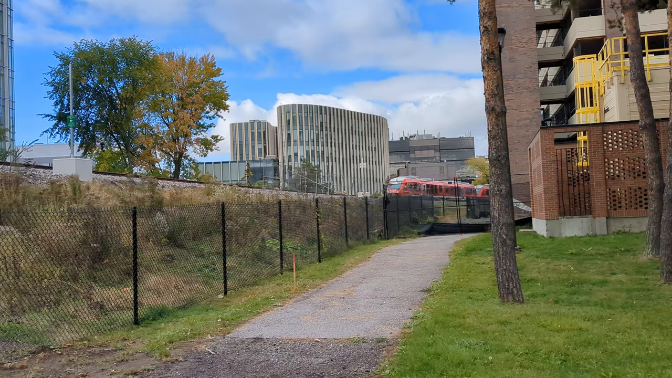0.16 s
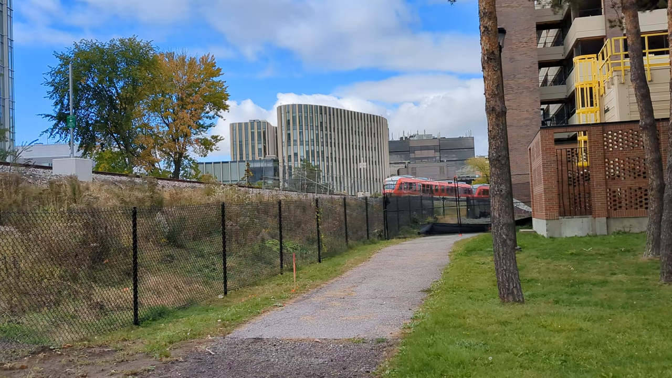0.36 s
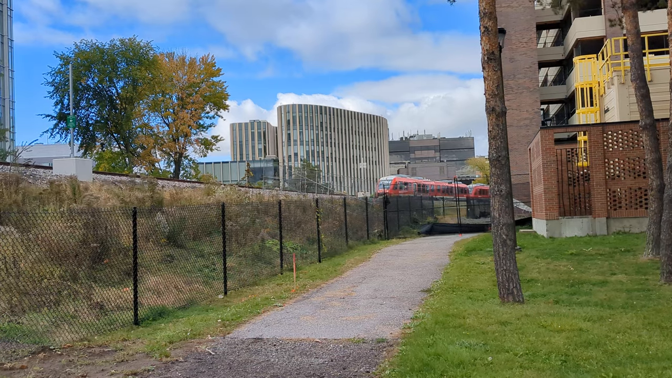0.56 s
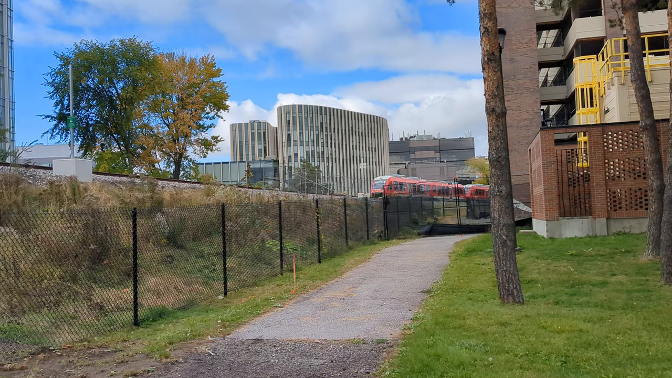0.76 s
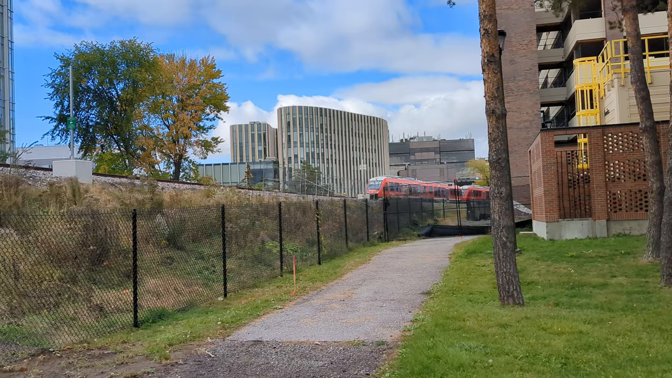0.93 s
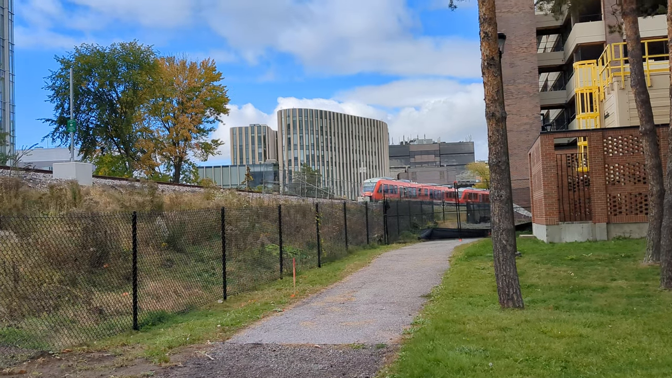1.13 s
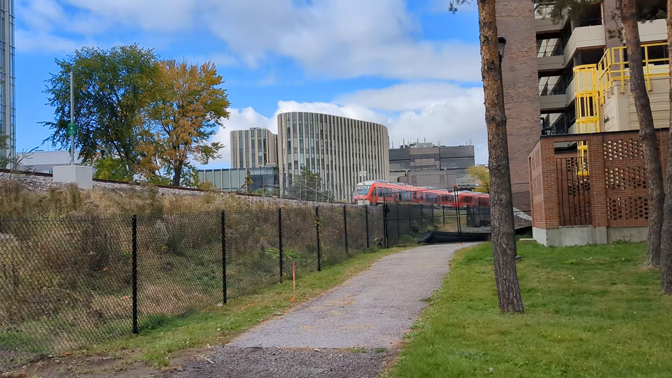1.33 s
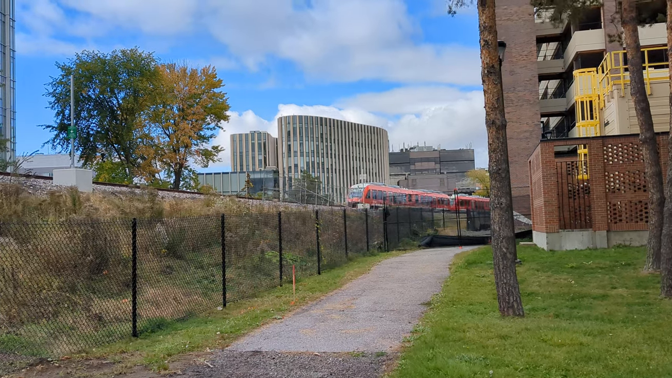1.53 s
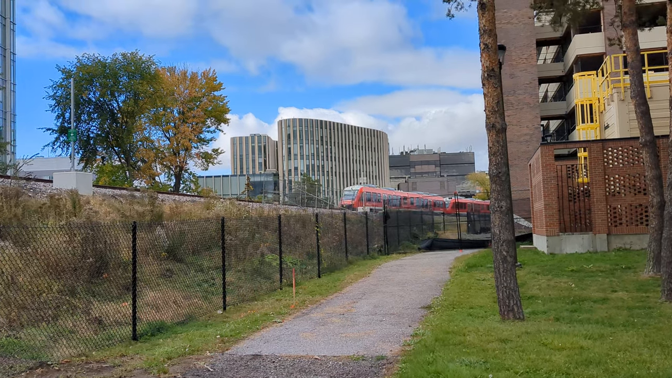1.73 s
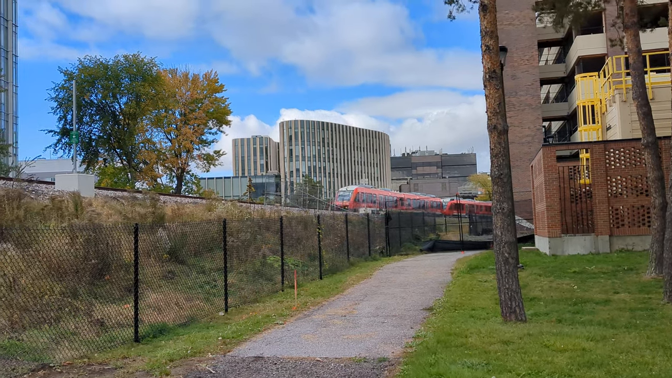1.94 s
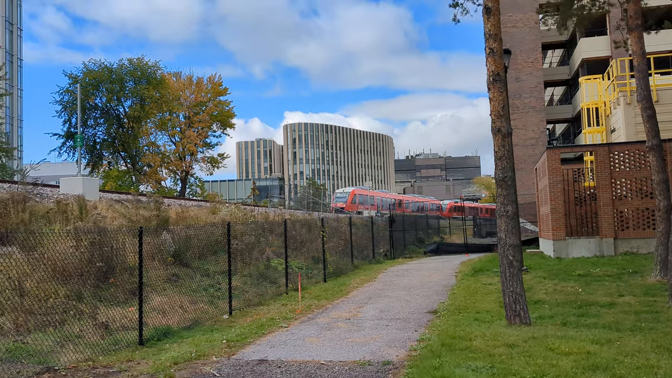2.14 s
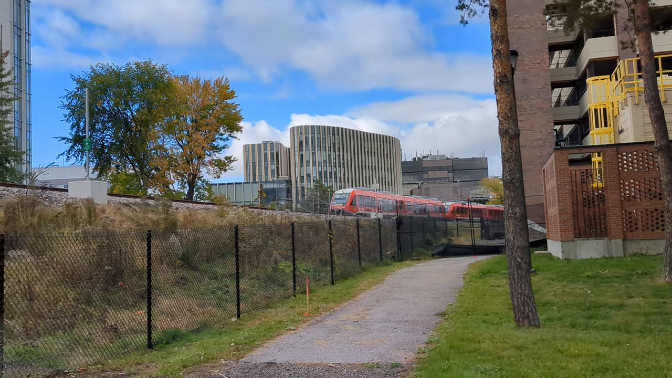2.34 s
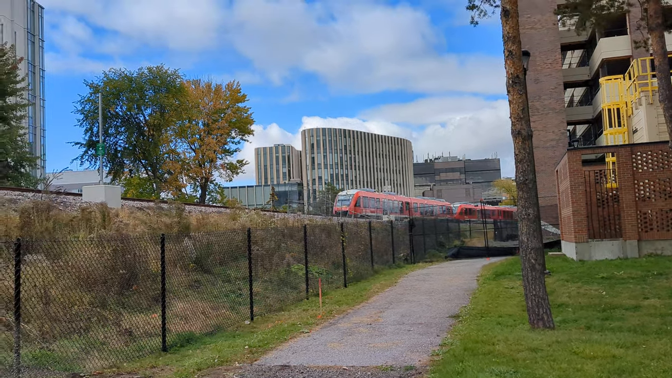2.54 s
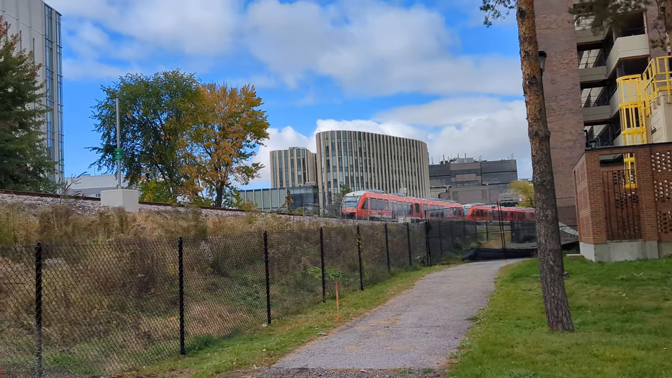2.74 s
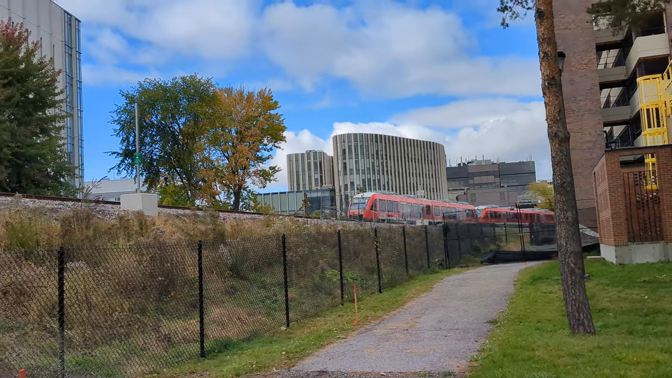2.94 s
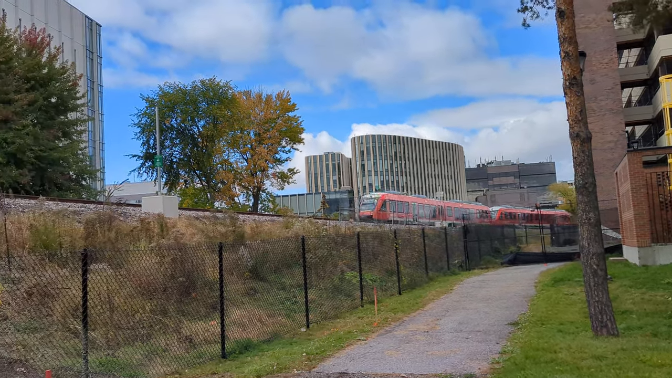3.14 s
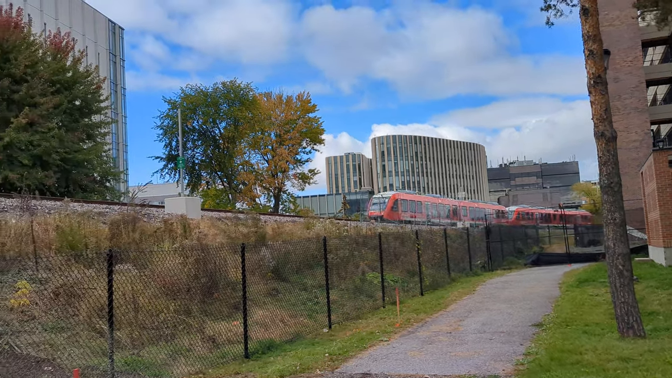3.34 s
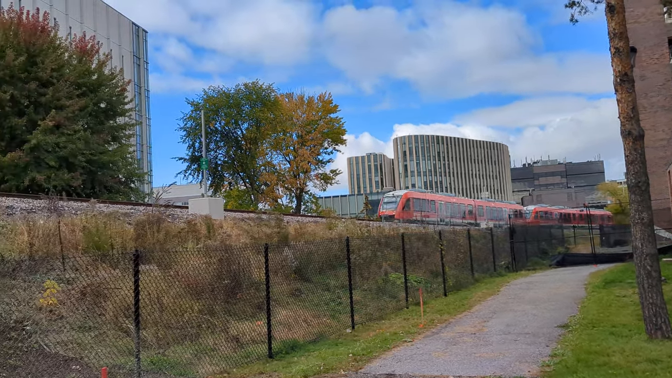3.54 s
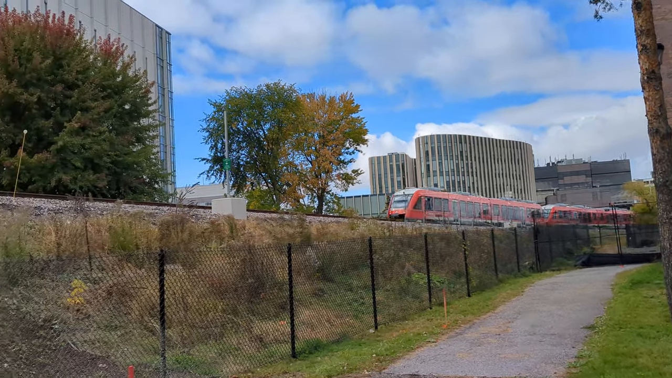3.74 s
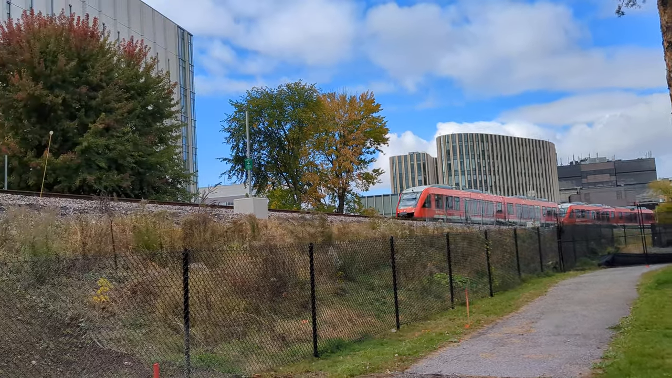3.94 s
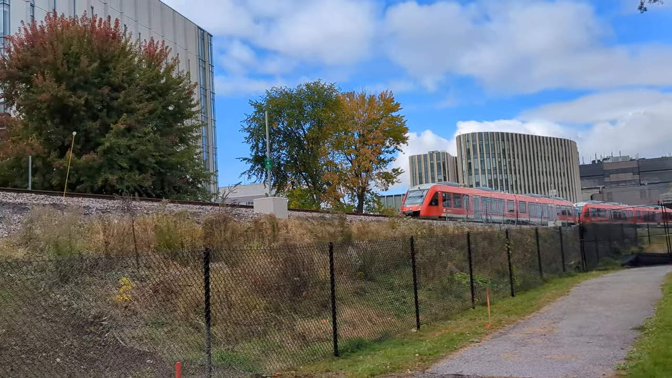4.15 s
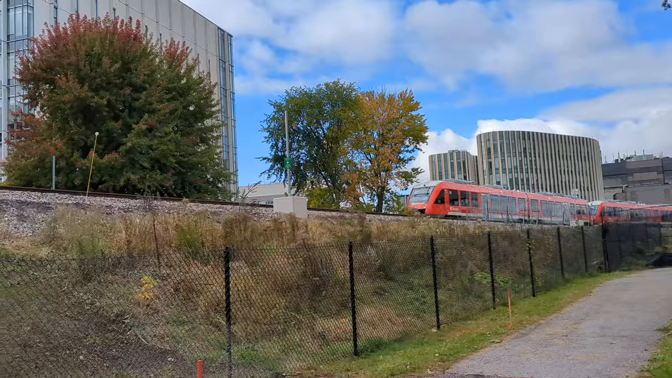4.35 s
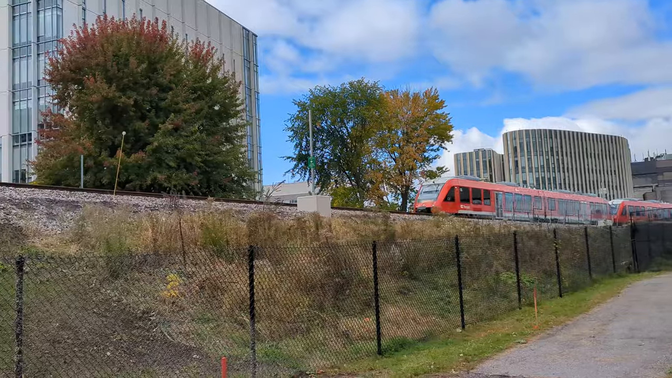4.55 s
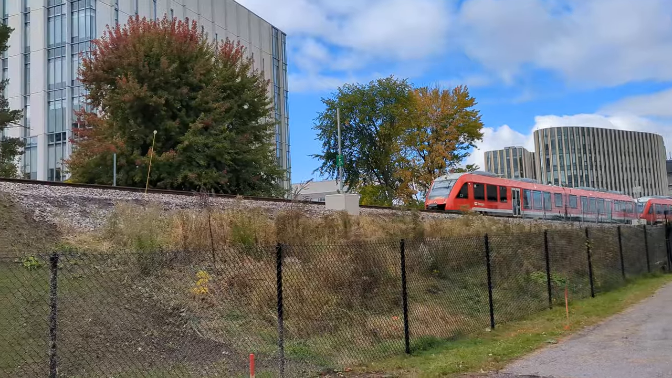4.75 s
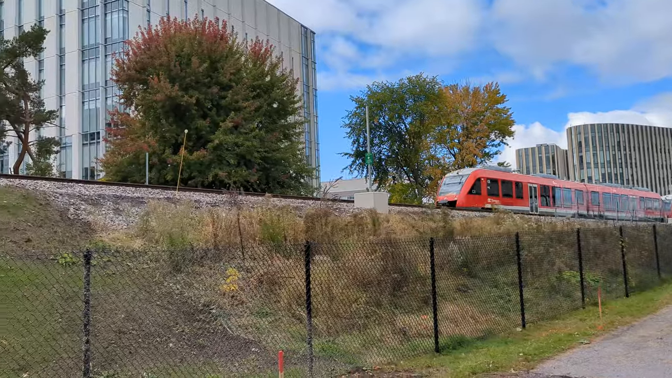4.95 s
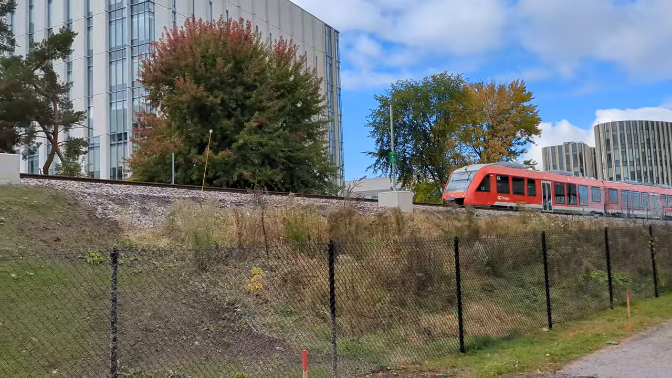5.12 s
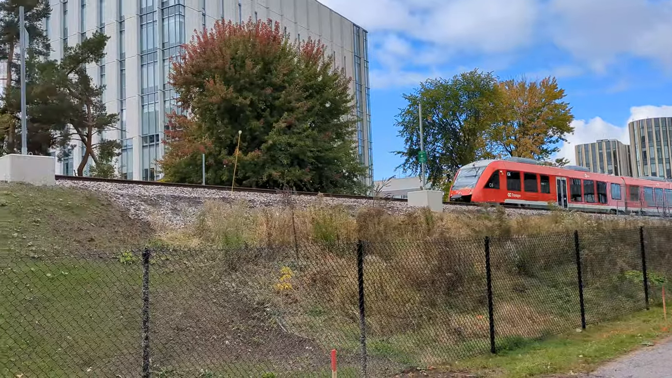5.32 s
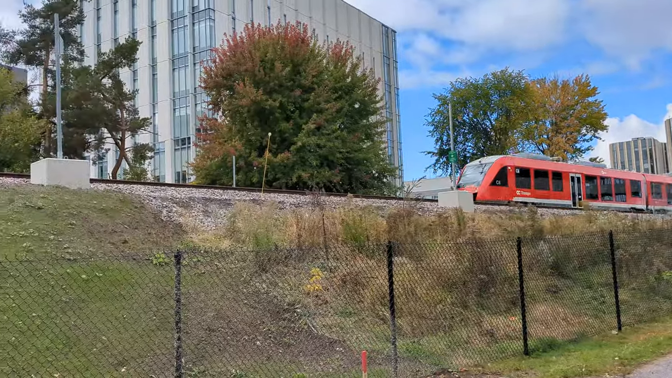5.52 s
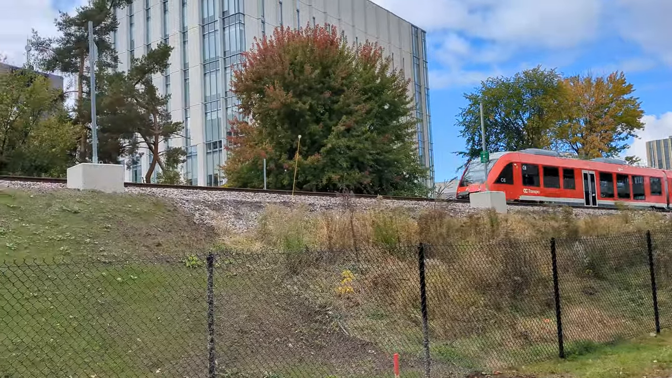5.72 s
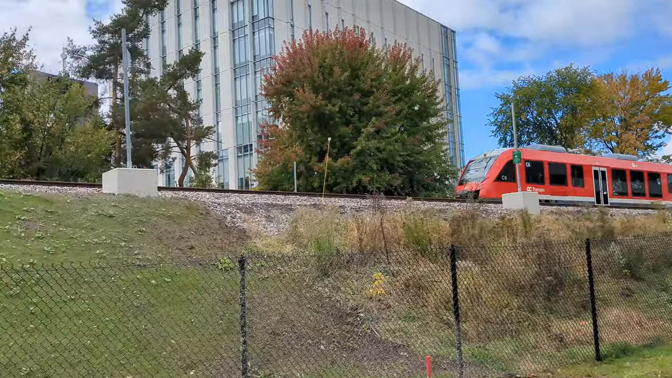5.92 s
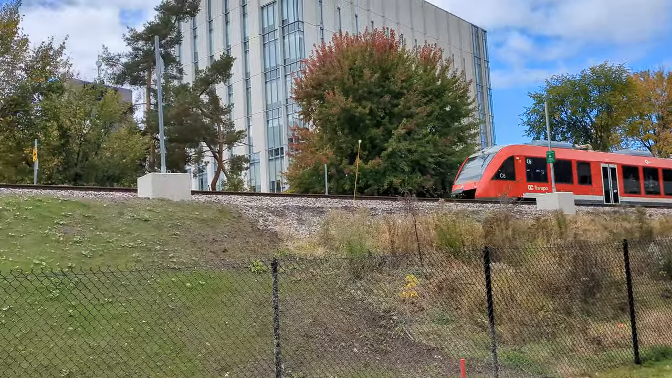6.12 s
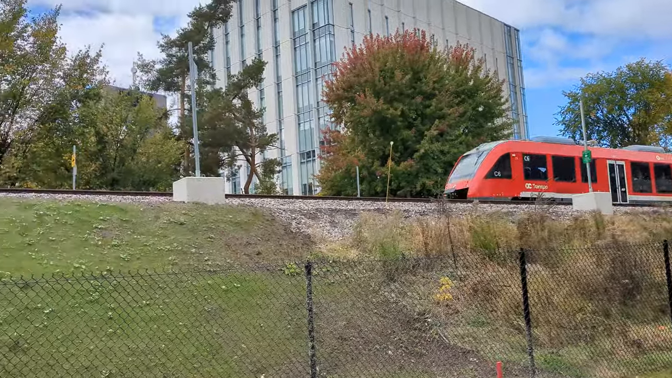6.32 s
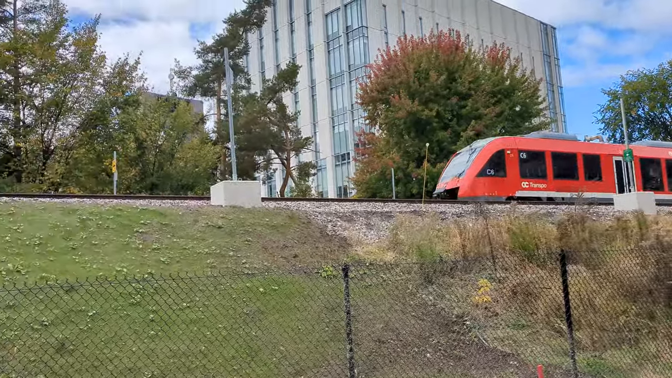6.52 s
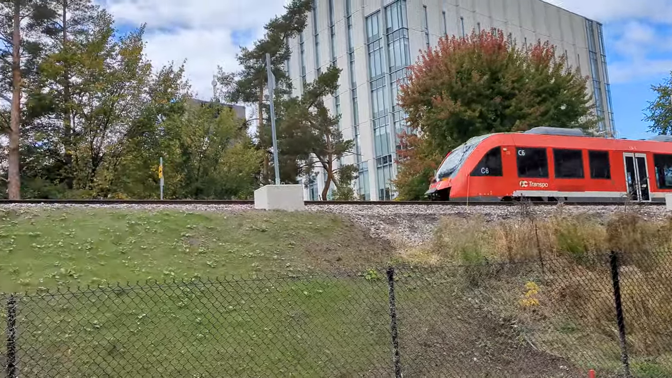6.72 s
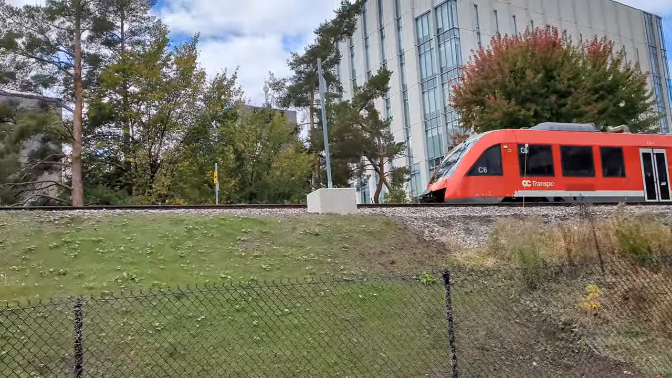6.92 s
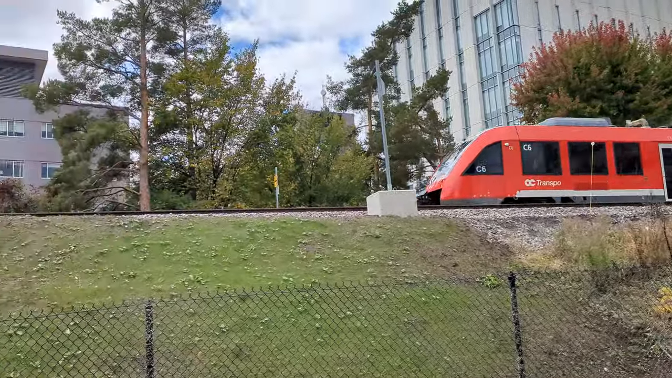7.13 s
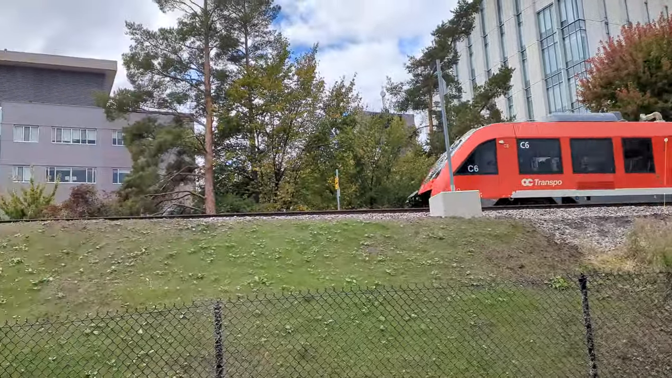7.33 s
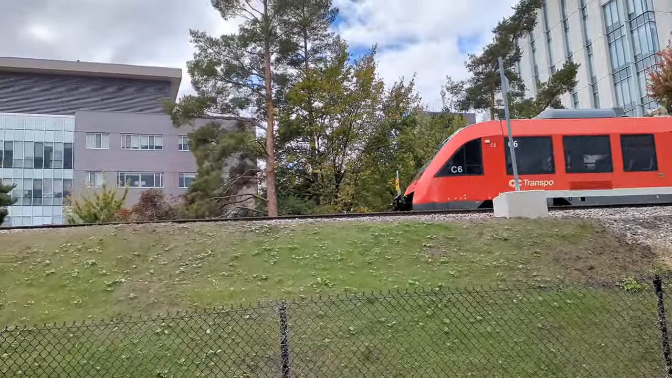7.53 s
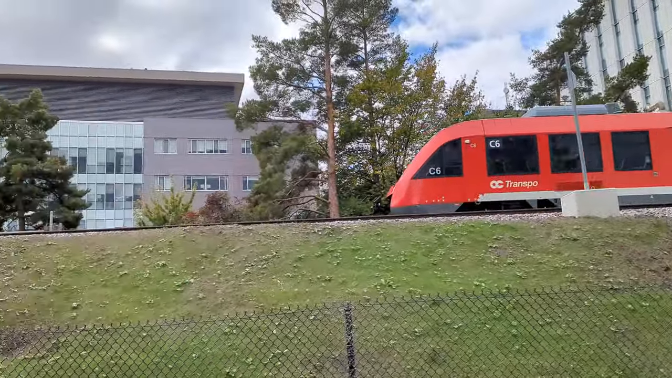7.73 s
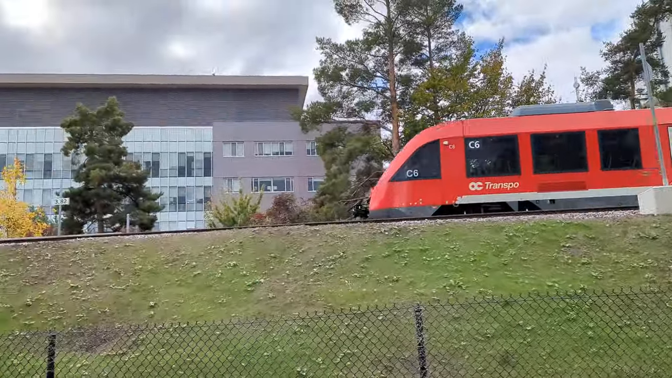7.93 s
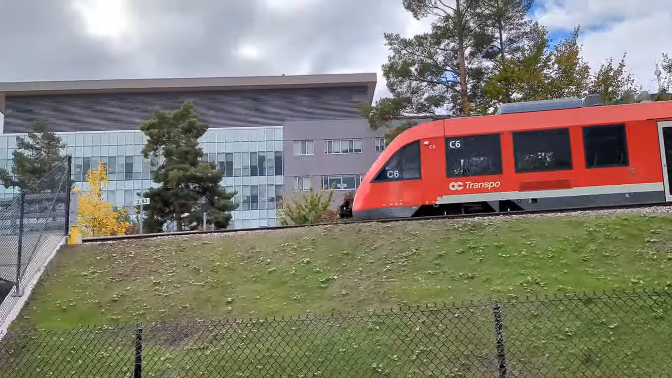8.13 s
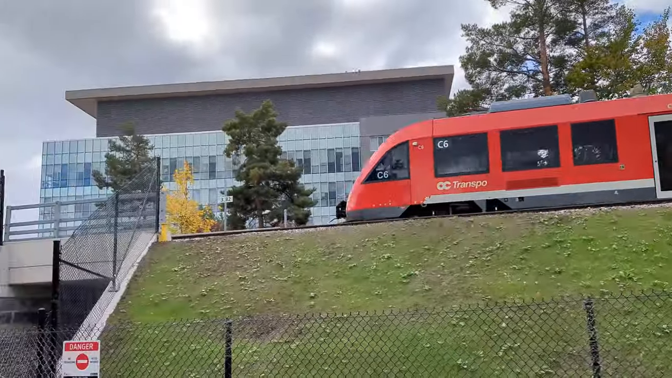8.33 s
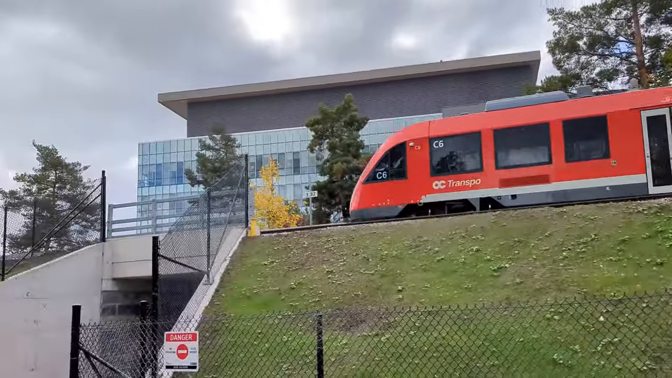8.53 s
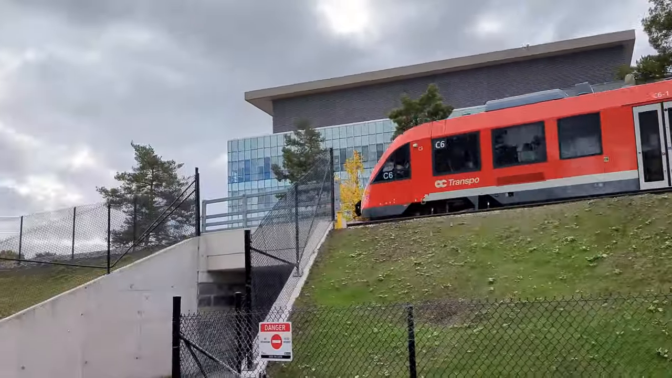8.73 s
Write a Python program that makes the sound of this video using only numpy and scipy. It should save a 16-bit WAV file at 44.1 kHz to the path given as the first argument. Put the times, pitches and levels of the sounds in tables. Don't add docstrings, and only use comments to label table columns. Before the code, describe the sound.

Intermittent steel wheel squeal and grinding from an approaching diesel train grows louder and shriller, with engine hum, wheel roar and low wind gusts.

```python
import sys
import numpy as np
from scipy import signal
from scipy.fft import rfft, irfft, next_fast_len
from scipy.io import wavfile
from scipy.ndimage import uniform_filter1d, map_coordinates

SR = 44100
rng = np.random.default_rng(int(sys.argv[2]) if len(sys.argv) > 2 else 0)


def digitize_waveform(pressure):
    field = np.atleast_2d(pressure).T
    bounded = np.clip(field, -1, 1)
    quanta = np.round(bounded * 32767).astype(np.int16)
    wavfile.write(sys.argv[1], SR, quanta)


def how_loud(loudness_db):
    steps = np.asarray(loudness_db, float) / 20
    return 10 ** steps


N = 386757

# (frequency [Hz], level [dB])
EDDY_FLUTTER = [(100, -4), (200, 2), (300, -1), (450, -9.5), (620, -16), (900, -34)]


def unit(x):
    return x / np.sqrt(np.mean(x ** 2) + 1e-20)


def curves(rows):
    s, *cols = np.transpose(rows)
    return [np.interp(np.arange(N) / SR, s, c) for c in cols]


def window(rows, fade):
    t = np.arange(N) / SR
    inside = np.minimum(t - rows[0][0], rows[-1][0] - t)
    return np.clip(inside / fade + 1, 0, 1)


def wobble(rate):
    knots = int(N * rate / SR) + 2
    return np.interp(np.arange(N) * rate / SR, np.arange(knots), rng.standard_normal(knots))


def swell(peak, rise, fall):
    t = np.arange(N, dtype=np.float32) / SR - peak
    return np.maximum(-t / max(rise, .01), t / max(fall, .01))


def shape(points):
    f, db = np.transpose(points)
    return lambda hz: how_loud(np.interp(np.log(hz + 1), np.log(f + 1), db, left=-120, right=-120))


def mode(hz, centre_hz, width_hz):
    return width_hz / np.hypot(width_hz, 2 * (hz - centre_hz))


def noise(gain, channels=3):
    size = next_fast_len(N)
    hz = np.fft.rfftfreq(size, 1 / SR)
    draw = rng.standard_normal((2, channels, len(hz)), dtype=np.float32)
    spectrum = (draw[0] + 1j * draw[1]) * gain(hz).astype(np.float32)
    return unit(irfft(spectrum, size)[:, :N])


def filtered(x, gain):
    edge = SR // 10
    size = next_fast_len(N + 2 * edge)
    z = rfft(np.pad(x, ((0, 0), (edge, size - N - edge)), "reflect"))
    return irfft(z * gain(np.fft.rfftfreq(size, 1 / SR)), size)[:, edge:edge + N]


def arrive(trio, direct, order=1, lag=1):
    # (time [s], delay of left after right [ms])
    ear_delay = [
        (0, 0.049),
        (2.5, 0.02),
        (3.5, 0.081),
        (4.5, .17),
        (6, .26),
        (6.8, 0.12),
        (7.5, .36),
        (8.77, .36),
    ]
    half = lag * curves(ear_delay)[0] * SR / 2000
    both = [map_coordinates(trio[0], [np.arange(N) - side * half], order=order, mode="nearest")
            for side in (1, -1)]
    return np.sqrt(direct) * np.array(both) + np.sqrt(1 - direct) * trio[1:]


def gaps(hz):
    # (frequency [Hz], width [Hz], share lost [0 to 1])
    valleys = [(3213, 166, .6), (4050, 165, .4), (5160, 166, .45)]
    return np.prod([1 - lost * mode(hz, c, w) ** 2 for c, w, lost in valleys], axis=0)


def steel():
    # (frequency [Hz], difference [dB])
    lean = [(1000, -29), (1800, -5.5), (3000, 7), (5000, 0), (10000, 0.5), (15000, 1.5)]
    sides = np.array([[.5], [-.5]])
    both = arrive(flanges() + squeals(), direct=.58, order=3)
    return filtered(both, lambda hz: gaps(hz) * shape(lean)(np.clip(hz, 1000, 15000)) ** sides)


def contact():
    # (start [s], length [s], grind [dB], growl over it [dB], sizzle over it [dB])
    rubs = [(0, .33, -54, 3, -16), (0.704, 0.58, -54, -1.5, -16), (1.402, 0.08, -51, -2, -23),
            (1.623, 0.076, -51.5, -6, -16), (2.007, .36, -46, -2.5, -14), (2.52, 0.088, -46.5, 0.5, -15),
            (2.64, .7, -43.5, -9, -14), (3.401, 0.27, -43, 1.5, -17), (3.787, 0.44, -47, -1, -12.5),
            (4.22, 0.24, -45, -1.5, -17), (4.511, 0.29, -38, -1, -13.5), (4.851, 0.63, -41.5, -4, -4),
            (5.41, 0.15, -38.5, -2.5, -14), (5.64, 0.56, -40.5, -5.5, -14), (6.265, 0.21, -43, -3, -5),
            (6.513, 0.16, -37.5, -11.5, -9), (6.736, 0.11, -42.5, -4, -6), (6.895, 0.33, -37, -4, -3),
            (7.31, .12, -45, -2, -13), (7.465, 0.31, -34, -7.5, -5.5), (7.868, 0.11, -36, -3.5, -6.5),
            (8.02, 0.21, -32, -4.5, -3), (8.296, 0.31, -34.5, -7.5, -14), (8.66, .15, -42, -4, -3)]
    bite_s, let_go_db_per_s = 0.022, 96
    step = SR // 200
    t = np.arange(0, N + step, step) / SR
    power = 1e-10
    for s, length, db, growl_db, sizzle_db in rubs:
        fading = how_loud(db - let_go_db_per_s * np.maximum(t - s - length, 0))
        held = np.clip((t - s) / bite_s + 1, 0, 1) * fading
        power = power + (held * how_loud([[0], [growl_db], [sizzle_db]])) ** 2
    return [np.interp(np.arange(N) / SR, t, np.sqrt(p)) for p in power]


def flanges():
    # (frequency [Hz], level [dB])
    grind_tone = [(1760, -27), (3000, -13.5), (3190, -19), (3530, -10), (3920, -7.5), (4520, -4),
                  (5070, -10.5), (7090, -6.5), (7910, -9.5), (10500, -13), (13600, -66), (22000, -120)]
    growl_tone = [(1300, -19.5), (1700, -9), (2000, -5.5), (2400, -2.5), (2800, -8), (3050, -9.5),
                  (3250, -14)]
    sizzle_tone = [(8000, -9.5), (10500, -7.5), (12200, -4), (12700, -14), (13600, -19), (13900, -36),
                   (15000, -36), (15700, -36)]
    # (frequency [Hz], width [Hz], level over the grind [dB])
    wheel_modes = [(2350, 250, -0.5), (2980, 50, 9), (3470, 200, 10), (4670, 100, 3.5), (5370, 140, 4.5),
                   (5940, 27, 6), (6680, 140, 2.5), (6970, 120, 0.5), (8750, 70, 3), (9330, 100, 6.5),
                   (9960, 85, 5.5), (13000, 28.7, 7), (13430, 25, 7), (14270, 40, 7)]
    grind, growl, sizzle = contact()
    pitches, levels = rng.uniform(2000, 15000, size=70), rng.normal(5, 2, size=70)
    minor = [(c, 22, db) for c, db in zip(pitches, levels)]
    hz = np.fft.rfftfreq(next_fast_len(N), 1 / SR).astype(np.float32)
    modes = wheel_modes + minor
    ring = np.sqrt(1 + sum((float(how_loud(db)) * mode(hz, float(c), w)) ** 2 for c, w, db in modes))
    layers = how_loud(2.0) * grind * noise(lambda f: ring * shape(grind_tone)(f))
    layers = layers + how_loud(-1.5) * growl * noise(lambda f: ring * shape(growl_tone)(f))
    layers = layers + how_loud(5.5) * sizzle * noise(lambda f: ring * shape(sizzle_tone)(f))
    chatter = how_loud(0.78 * wobble(14) + 0.39 * wobble(90))
    return chatter * patches(layers, depth_db=2.0)


def patches(x, depth_db):
    z = signal.stft(x.astype(np.float32), nperseg=512)[2]
    field = uniform_filter1d(rng.standard_normal(z.shape[1:]), size=5, axis=0)
    field = uniform_filter1d(field, size=14, axis=1)
    return signal.istft(z * how_loud(depth_db * unit(field)).astype(np.float32), nperseg=512)[1][:, :N]


def songs():
    # (peak [s], rise [s], fall [s], level [dB])
    low_song = [(.05, 0.034, 0.096, -45), (.24, 0.11, 0.66, -49), (.74, .05, 0.4, -45),
                (1.2, 0.44, 0.16, -45.5), (1.66, 0.056, 0.1, -41), (2.04, 0.042, 0.33, -41.5),
                (2.3, 0.3, 0.1, -35.5), (2.75, 0.3, 1, -42.5), (4.25, 0.13, 0.17, -39.5),
                (4.62, 0.15, 0.2, -34.5), (5.01, 0.096, 0.042, -41), (5.46, .07, 0.18, -38.5),
                (6.98, 0.1, 0.51, -35), (7.6, 0.29, 0.42, -45), (8.06, 0.21, 0.05, -33),
                (8.5, 0.74, 0.23, -42)]
    # (peak [s], rise [s], fall [s], level [dB], pitch [Hz])
    mid_song = [(4.08, .3, .35, -42.5, 10190), (5.0, 0.37, 0.07, -41, 10170),
                (5.201, .13, 0.53, -38, 10160), (6.0, 0.41, 0.65, -37.5, 10100),
                (6.2, 0.27, 0.27, -43, 9950), (6.45, 0.64, 0.34, -34.5, 10250),
                (6.7, 0.4, 0.067, -31.5, 10190), (6.95, .3, 0.33, -37.5, 10155),
                (7.7, 0.2, .15, -34, 10100), (7.5, .05, .3, -40, 10300), (8.08, 0.074, 0.22, -30, 10000),
                (8.5, .09, .1, -37, 10300)]
    high_song = [
        (7.1, .25, .25, -50, 11600),
        (7.58, 0.18, 0.2, -30.5, 11644),
        (8.08, .07, .1, -33, 11580),
        (8.21, 0.11, 0.18, -24, 11540),
        (8.57, 0.35, 0.08, -26, 11510),
        (8.77, .15, 0.11, -38, 11640),
    ]
    # (peak [s], rise [s], fall [s], level [dB], pitch [Hz])
    pure_cries = [(3.406, 0.025, 0.16, -52.5, 1377), (2.08, 0.14, 0.45, -48, 3030),
                  (2.6, .08, 1, -56, 2977), (5.23, 0.42, .25, -39, 8885), (6.92, 0.064, 0.2, -38, 5884),
                  (7.1, .1, .25, -43, 5800), (0.98, .3, .5, -59, 2972), (0.96, .08, .1, -56, 4480),
                  (1.63, .2, .3, -56, 3300), (3.04, .15, 0.23, -48, 4660), (3.15, .4, .4, -52, 2972),
                  (7.1, 0.14, 0.25, -35.5, 6990), (7.8, .25, .12, -51, 12600), (8.4, .03, 0.48, -51, 13435),
                  (7.694, 0.26, 0.11, -36.5, 5854), (7.55, .08, 0.64, -41.5, 8620),
                  (8.51, .08, .12, -34.5, 5870)]
    hazy_cries = [(2.245, 0.17, 0.22, -45.5, 7140), (2.05, .05, 0.89, -51.5, 8900),
                  (2.89, 0.3, 0.23, -41, 8900), (2.73, .15, .6, -49, 4550), (3.1, .35, 0.34, -46.5, 4700),
                  (3.55, 0.2, 0.27, -48.5, 11400), (3.46, .2, .5, -46, 5800), (3.75, 0.39, 0.47, -46, 5400),
                  (4.4, .06, 0.063, -43.5, 4760), (5.32, 0.68, 0.21, -39, 7150),
                  (7.46, 0.11, 0.77, -37, 9400), (8.06, .3, 0.98, -34.5, 9350),
                  (8.04, 0.042, 0.3, -33.5, 6960), (8.42, .1, .3, -40, 7100), (3.2, .05, 0.054, -48, 7100),
                  (8.64, .12, .05, -38, 4600), (.7, .015, .06, -55, 4200), (2.8, .2, .3, -52, 5400),
                  (7, .15, .35, -48, 4613), (7.92, .03, .05, -40, 8800), (.32, .04, .03, -45, 3545),
                  (2.74, .15, 0.24, -53, 4440), (7, .05, .04, -45, 3500), (5.5, .1, .06, -45, 3650)]
    # (pitch [Hz], width [Hz], skirt [dB], bursts as in the lowest song)
    scrapes = [
        (2100, 910, -25, [(2.604, 0.041, 0.097, -41.5)]),
        (5270, 2100, -31, [(5.46, .07, 0.16, -40)]),
    ]
    sung = [(3550, 13, -5, low_song), *scrapes]
    kinds = [(15, 3.5, mid_song), (18, -3, high_song), (16, -12.5, pure_cries), (24, -4, hazy_cries)]
    for width_hz, skirt_db, cries in kinds:
        sung += [(hz, width_hz, skirt_db, [burst]) for *burst, hz in cries]
    return sung


def squeals():
    wider, lower = 7.4, 2.9
    drop_db = 13
    steady, wander = .7, .35
    out = np.zeros((3, N))
    press = contact()[0] ** 0.36
    rub, shake = noise(np.ones_like).astype(np.float32), wobble(25)
    drift = np.array([wobble(3), wobble(3), wobble(3)])
    load = 1 + .0006 * wobble(7)
    for hz, width_hz, skirt_db, bursts in songs():
        level = np.zeros(N)
        for peak, rise, fall, db in bursts:
            gone = swell(peak, rise, fall)
            on = gone < 1.3
            burst = how_loud(db - drop_db * gone[on]) * np.clip(3.7 * (1.3 - gone[on]), 0, 1)
            burst = burst / press[min(int(abs(peak) * SR), N - 1)]
            level[on] = np.hypot(level[on], burst)
        first, last = np.flatnonzero(level)[[0, -1]]
        size = next_fast_len(max(last - first, SR // 2))
        start = max(min(first, N - size), 0)
        f = np.fft.rfftfreq(size, 1 / SR)
        core = mode(f, hz, width_hz) ** 2.8
        skirt = mode(f, hz - lower * width_hz, wider * width_hz) ** 1.016
        skirt = how_loud(skirt_db) / np.sqrt(wider) * skirt
        lock = steady * (width_hz < 100)
        total = np.sqrt(np.mean(core ** 2 + skirt ** 2))
        gain = np.hypot(np.sqrt(1 - lock) * core, skirt) / total
        cry = irfft(rfft(rub[:, start:start + size], size) * gain.astype(np.float32), size)
        cry = cry[:, :last - first]
        pitch = hz * load[first:last] + wander * width_hz * np.roll(shake, int(hz) * 17)[first:last]
        turn = 2 * np.pi * np.cumsum(pitch) / SR
        tone = np.sin(turn + 3 * drift[:, first:last])
        cry = cry + np.sqrt(2 * lock * np.mean(core ** 2)) / total * tone
        uneven = how_loud(2.0 + 1.34 * np.roll(shake, int(hz) * 31)[first:last])
        out[:, first:last] += uneven * (press * level)[first:last] * cry
    return out


def engine(rows, orders, shake_db):
    hz, db = curves(rows)
    turn = 2 * np.pi * np.cumsum(hz) / SR
    apart = (.1 + .38 * wobble(4)) * np.array([[1], [-1]])
    hum = sum(how_loud(level + shake_db * wobble(15)) * np.sin(k * turn + 0.39 * wobble(7.6) + apart)
              for k, level in orders)
    return np.sqrt(2) * how_loud(db) * window(rows, fade=0.43) * hum


def near_engine():
    # (time [s], firing rate [Hz], level [dB])
    near_hum = [(5.5, 61.2, -54), (5.87, 61.8, -48.5), (7.0, 64, -37.5), (7.52, 65.2, -34),
                (7.57, 65.4, -25), (7.66, 65.7, -24), (7.7, 65.8, -19), (7.89, 65.84, -16.5),
                (7.97, 66, -24), (8.02, 66.25, -20), (8.12, 66.5, -25), (8.24, 67.1, -30.5),
                (8.3, 66.9, -42), (8.77, 67.4, -40)]
    # (multiple of firing rate [times], level [dB])
    near_overtones = [(.5, -25), (1, 0), (1.5, -26), (2, -20), (3, -28), (5, -28), (6, -24)]
    return engine(near_hum, near_overtones, shake_db=1.8)


def far_engine():
    # (time [s], firing rate [Hz], level [dB])
    far_hum = [
        (0.0, 66.54, -56.5),
        (1.2, 70.2, -56.5),
        (1.6, 70.5, -56),
        (3.25, 75.9, -50.5),
        (3.34, 75.8, -43),
        (3.72, 78.84, -37.5),
        (4.33, 80.45, -43),
        (4.87, 70.9, -54),
        (5.0, 71.5, -64),
    ]
    # (multiple of firing rate [times], level [dB])
    far_overtones = [(.5, -17), (1, 2), (2, -9), (3, -14.5)]
    return engine(far_hum, far_overtones, shake_db=1.5)


def rolling():
    # (time [s], level [dB])
    roar_level = [(0, -51.5), (.64, -58), (.75, -53), (1.98, -55), (3.08, -53), (3.66, -45), (4.35, -51),
                  (5.35, -51.5), (5.49, -45), (6.06, -52), (6.15, -47.5), (6.6, -55), (6.91, -47.5),
                  (7.35, -51), (7.64, -40.5), (8.01, -38), (8.4, -45), (8.77, -47)]
    # (frequency [Hz], level [dB])
    roar_tone = [(110, -20), (180, -5.5), (220, -4), (275, -8.5), (415, -7.5), (540, -6), (674, -1.5),
                 (858, -4.5), (998, -12), (1210, -6.5), (1320, -1.5), (1640, -10), (2000, -7.5),
                 (2600, -20), (4400, -120)]
    # (frequency [Hz], width [Hz], level [dB])
    drone_modes = [(334, 120, -3.5), (393, 167, 3.5)]
    roar_db, = curves(roar_level)
    drone_db = -12.5 + 1.6647 * np.arange(N) / SR
    hollow = noise(lambda f: sum(how_loud(db) * mode(f, c, w) ** 2 for c, w, db in drone_modes))
    drone = arrive(hollow, direct=.9)
    roar = arrive(noise(shape(roar_tone)), direct=0.53, lag=0.64)
    return how_loud(roar_db + 0.46 * wobble(11)) * (how_loud(3.0) * roar + how_loud(drone_db) * drone)


def murmur():
    band = arrive(noise(lambda f: mode(f, 450, 190) ** 2), direct=.8)
    gone = swell(peak=6, rise=1, fall=1.3)
    return how_loud(-53.5 - 8 * gone ** 2 + 2.5 * wobble(12)) * band


def wind():
    # (peak [s], rise [s], fall [s], level [dB], flutter over it [dB])
    blows = [(.2, 0.67, 0.42, -57.5, -9), (1.46, .7, 0.32, -46.5, -9), (2.69, 0.61, 0.26, -51, -6),
             (3.7, 0.49, 0.61, -38, -8.5), (4.33, 0.17, 0.093, -35.5, -3.5), (5.03, 0.22, 0.18, -42, -12),
             (5.13, 0.092, 0.11, -51, -3), (5.8, 1, 0.17, -48.5, -8.5), (6.18, 0.031, .08, -53, 6),
             (6.95, 1, 0.46, -48, -25), (7.69, 0.18, .3, -31.5, -16), (7.89, 0.12, 0.32, -27, -10.5),
             (8.33, 0.12, 0.29, -31.5, -10), (8.6, 0.24, 0.11, -45.5, 3)]
    # (frequency [Hz], level [dB])
    buffet_tone = [(15, -42), (30, -5), (50, -0.5), (100, 0), (160, -6.5), (240, -28.5), (400, -35)]
    calm_db, drop_db = -63.5, 11.5
    power = how_loud([[calm_db], [calm_db - 8]]) ** 2
    for peak, rise, fall, db, flutter_db in blows:
        push = how_loud([[db], [db + flutter_db]]) * how_loud(-drop_db * swell(peak, rise, fall))
        power = power + push ** 2
    gust, flutter = np.sqrt(power)
    lumps = how_loud(3.9 * np.array([wobble(22), wobble(22), wobble(22)]))
    eddies = lumps * (gust * noise(shape(buffet_tone)) + flutter * noise(shape(EDDY_FLUTTER)))
    return how_loud(-3.0) * (1.14 * eddies[0] + 1.42 * eddies[1:])


def puffs():
    # (time [s], peak level [dB], pitch [Hz], left over right [dB])
    slaps = [(1.416, -32, 136, -2), (1.693, -36.5, 75.4, -11), (3.539, -25, 72.4, -6),
             (3.608, -37, 78.1, -1.0), (3.687, -40, 85.4, 1), (3.79, -29, 81.2, 22),
             (3.908, -25.5, 72.4, -11), (4.239, -29, 131.4, 19), (4.312, -25.5, 73.4, 17),
             (4.379, -23, 71.5, 12), (5.133, -29, 72, -16), (6.155, -35, 390, 2), (6.17, -34, 420, 4),
             (6.184, -33, 470, 4), (6.22, -37, 372, 0), (6.25, -37, 380, 0), (4.218, -34, 181, 12),
             (4.263, -32, 298, 19), (4.328, -30.5, 420, 17), (4.338, -30, 330, 15), (4.385, -35, 380, 15),
             (4.41, -30.5, 140, 12), (7.467, -36, 325, 1), (7.627, -29, 330, 2), (7.829, -30, 380, 2.5),
             (7.894, -22.5, 300, -8), (8.03, -27, 250, 5), (8.058, -24, 280, 4.5),
             (8.48, -27.5, 223.4, -10), (8.6, -29, 100, 0), (8.637, -34, 260, -3.5), (7.79, -18, 72, 13),
             (7.882, -11, 81, -9), (7.959, -16, 72.7, 9), (8.029, -15.5, 72, 14), (8.229, -18, 73.4, -2),
             (8.301, -23.5, 116, -17), (8.331, -22, 72, -13), (8.358, -28, 72.7, -16),
             (8.391, -19.5, 173, -16), (8.44, -21.5, 72, -10), (8.54, -25.5, 110, 2)]
    rise_s, rise_hz = 0.0072, 100
    out, t = np.zeros((2, N + SR)), np.arange(SR // 8) / SR
    rustle = noise(shape(EDDY_FLUTTER), channels=2)
    phases = rng.normal(0, [9, 1.1], (len(slaps), 2)).cumsum(1)
    for (s, db, hz, pan_db), phase in zip(slaps, phases):
        at = round(s * SR)
        u = t / rise_s * (hz / rise_hz) ** 0.44
        swing = np.sin(2 * np.pi * hz * t + phase[:, None]) + 0.28 * rustle[:, at:at + len(t)]
        level = how_loud(db - 3.5 + pan_db * np.array([[.5], [-.5]]))
        out[:, at:at + len(t)] += level * u * np.exp(1 - u) * swing
    return out[:, :N]


def town():
    # (frequency [Hz], level [dB])
    hiss_tone = [(1500, -17), (2000, -7), (2700, -9), (4000, -11), (8000, -23), (12000, -25), (13500, -29),
                 (15600, -19)]
    hiss = noise(lambda hz: gaps(hz) * shape(hiss_tone)(hz) * (1 + 4.0 * mode(hz, 3470, 120)), channels=2)
    return how_loud(-53) * hiss


def scene():
    sway = how_loud(0.3 * wobble(3) * np.array([[1], [-1]]))
    train = steel() + (near_engine() + far_engine()) * sway + rolling() + murmur()
    return train + wind() + puffs() + town()


def dulled_by_treble(x):
    limit_db, fade_db = -41.5, -50
    treble = filtered(x.mean(0)[None], lambda hz: hz > 10800)[0]
    top = filtered(x, lambda hz: hz > 13550)
    power = np.abs(uniform_filter1d(treble ** 2, size=2048))
    over_db = 10 * np.log10(power + 1e-12) - limit_db
    return x + (how_loud(fade_db * np.clip(over_db / 3, 0, 1)) - 1) * top


def low_pass(x):
    return signal.sosfilt(signal.butter(12, 15740, fs=SR, output="sos"), x)


def record(dry):
    heard = filtered(dry, lambda hz: hz ** 3 / np.hypot(hz ** 3, 44 ** 3))
    mix = dulled_by_treble(heard)
    return low_pass(mix)


dry = scene()
out = record(dry)
digitize_waveform(out)
```